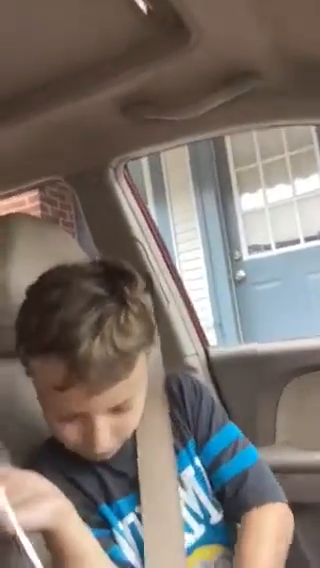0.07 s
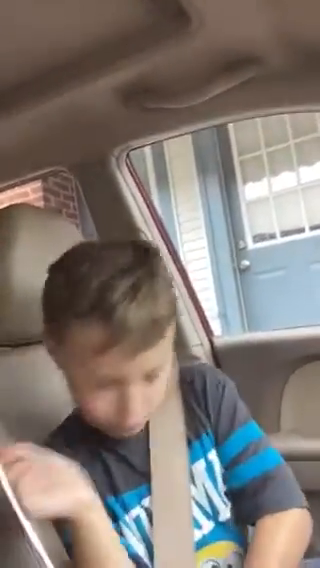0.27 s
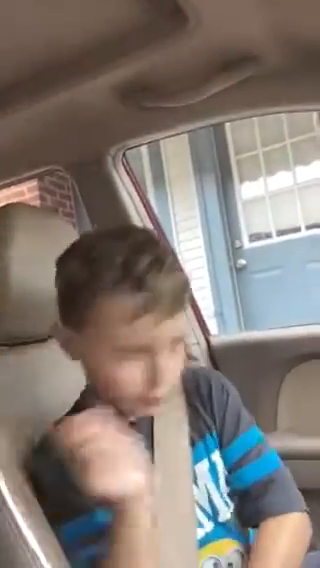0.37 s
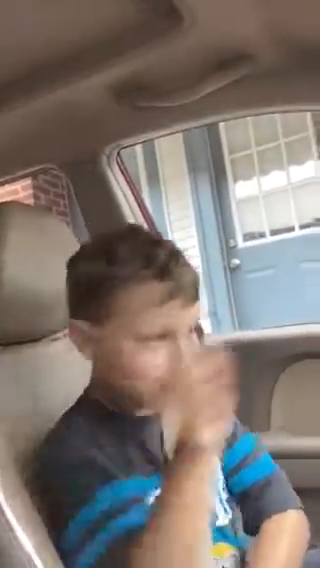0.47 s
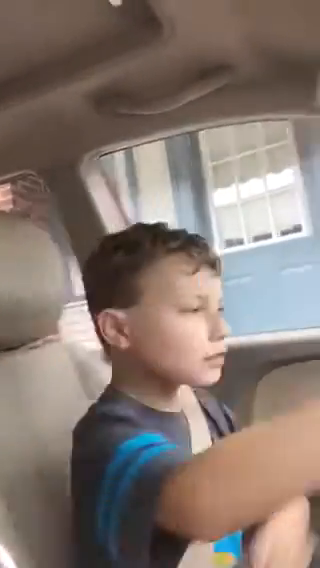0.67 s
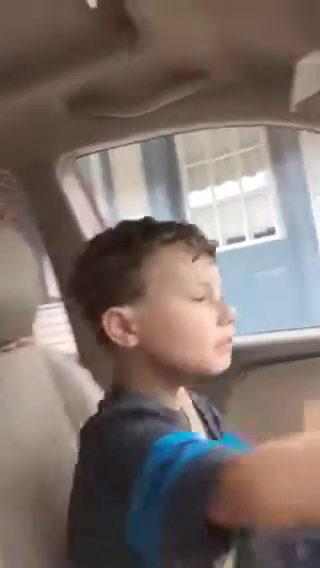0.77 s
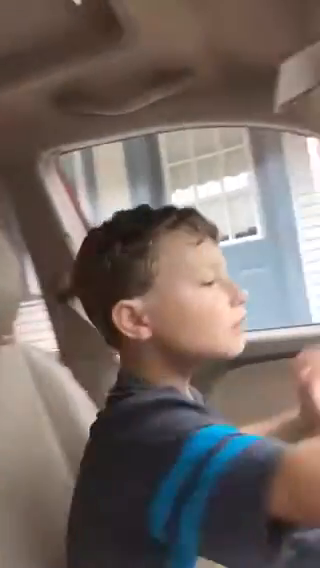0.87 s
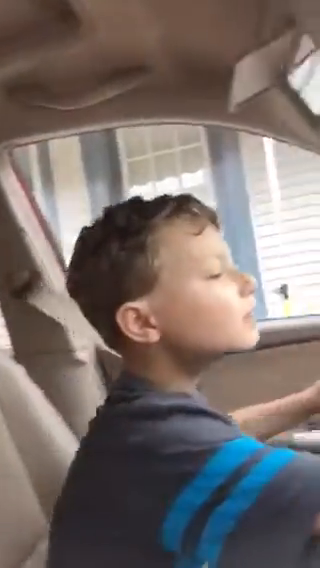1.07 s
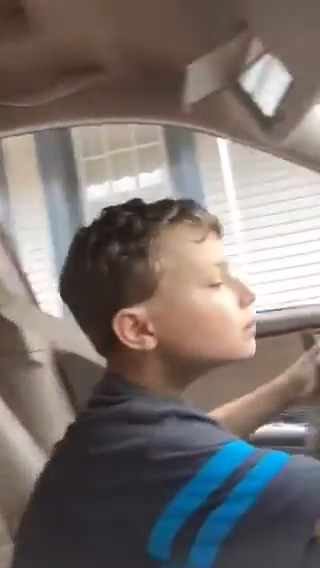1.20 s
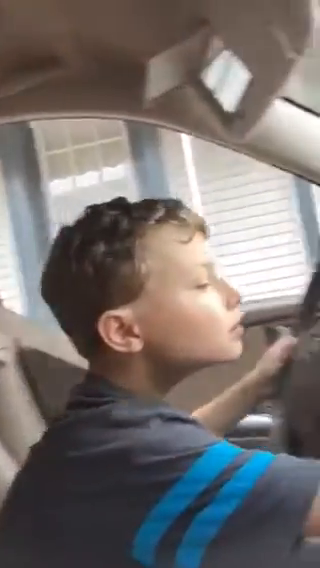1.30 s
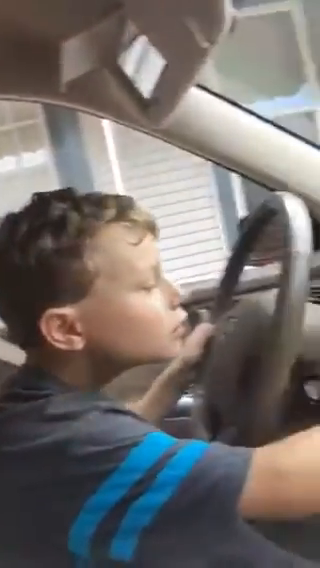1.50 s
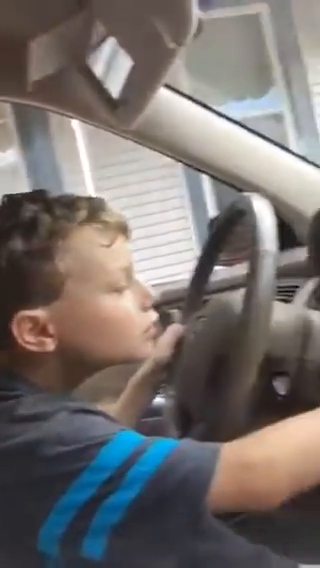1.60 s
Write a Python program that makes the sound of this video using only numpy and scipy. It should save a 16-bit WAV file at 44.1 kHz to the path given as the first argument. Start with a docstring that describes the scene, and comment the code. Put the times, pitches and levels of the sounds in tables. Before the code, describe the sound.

A seat belt is buckled inside a parked car. The metal tongue ticks lightly against the slot at about 0.1 seconds, then the latch snaps shut at 0.25 seconds with a sharp, dry metallic click. A smaller tick follows at 0.5 seconds. Faint cloth rustle, tiny ticks and soft padded bumps continue until about 1.6 seconds, over a faint low background noise.

```python
"""In a parked car, a seat belt is buckled: the tongue ticks against the slot, slides in, and the latch
snaps shut. The impact excites the damped modes of the steel, and absorption by the upholstery keeps
the reverberation short. Light ticks, cloth friction and padded bumps follow as someone shifts in
the seat, over a faint background noise."""
import sys
import numpy as np
from scipy import signal
from scipy.fft import rfft, irfft
from scipy.io import wavfile
from scipy.ndimage import uniform_filter1d

SR = 44100
rng = np.random.default_rng(int(sys.argv[2]) if len(sys.argv) > 2 else 0)


def unload_audio(sound):
    """Save the sound as a 16-bit wav file, at the path given as the first command line argument."""
    columns = np.transpose(np.atleast_2d(sound))
    # keep every value between -1 and 1, then stretch to whole-number steps
    steps = np.round(np.clip(columns, -1, 1) * 32767)
    wavfile.write(sys.argv[1], SR, steps.astype(np.int16))


N = 72765
T = np.arange(N) / SR

# contacts as the latch trips, snaps and rebounds: t/s, relative level/dB
LATCH_CONTACTS = [(0.2376, -8.5), (0.238, -3.5), (0.2403, 0), (0.2414, -0.5), (.2462, -8), (.2518, -17)]
# modes of the steel buckle: f/Hz, relative level/dB, T60/s
BUCKLE_MODES = [(590, -30, .03), (1060, -25, .05), (1427, -26, .07), (2070, -28.5, .06),
                (2890, -21.5, 0.038), (3020, -13.5, 0.041), (3240, -11, 0.011), (3470, -9.5, 0.037),
                (3870, -20, 0.043), (4075, -26.5, 0.038), (4575, -23, 0.038), (5100, -25, 0.04),
                (6880, -27, 0.032), (8160, -32.5, 0.043), (9700, -33, .042)]
# spectrum of the housing's crack: f/Hz, relative density/dB
CRACK_SPECTRUM = [(200, -26.5), (380, -29), (560, -1), (800, -15), (1100, -11), (1600, -5), (2400, 3),
                  (4200, 2), (6000, -5), (8000, -10.5), (12500, -13.5), (15500, -22)]
# spectrum of the cabin's diffuse field: f/Hz, relative density/dB
CABIN_SPECTRUM = [(300, -14.5), (800, -13), (1200, -3.5), (2000, -3.5), (3300, 5), (5000, -5), (10000, -9),
                  (15500, -20.5)]
# mode of the tongue, struck at the slot: t/s, f/Hz, level/dB, T60/s
TONGUE_MODE = (.103, 7330, -47, .062)
# light contacts of buckle, belt and trim:
# t/s, relative level/dB, peak f/Hz, fall below/(dB/octave), fall above/(dB/octave), T60/s
TICKS = [(0.0628, -42, 540, 8, 9, .06), (.0635, -50, 3000, 2, 20, 0.074),
         (0.092, -32.5, 3170, 2.5, 10, .05), (0.1023, -34.5, 3400, 1.5, 12, 0.059),
         (.118, -45, 3200, 4, 12, 0.074), (0.1344, -43, 4500, 4, 18, .045), (0.2225, -32, 2400, 8, 17, .06),
         (.229, -35, 2400, 8, 18, .022), (.2371, -17, 3500, 10, 8, .012),
         (0.4911, -26, 3600, 3.5, 11, .024), (0.503, -42, 1350, 14, 7, .07), (.559, -51, 2600, 6, 8, 0.11),
         (0.6017, -40.5, 2200, 9, 12, 0.082), (0.8891, -43, 1410, 14, 12, 0.038),
         (1.141, -52, 900, 4, 7, 0.033), (1.215, -45, 950, 2, 10, 0.054), (1.310, -55, 5200, 14, 16, 0.067),
         (1.333, -53, 1500, 4, 12, 0.053), (1.578, -43.5, 1266, 13, 9.5, 0.042),
         (1.615, -44.5, 2700, 0.2, 15, 0.047)]
# resonances of the trim: f/Hz, bandwidth/Hz, gain/dB
TRIM_RESONANCES = [(1220, 90, 4), (1400, 70, 3), (2650, 140, -1), (3380, 160, 0), (7200, 500, 1)]
# blows on seat and floor: t/s, relative level/dB
BUMPS = [(.111, -54), (.142, -48), (.254, -42), (.271, -49), (.546, -53), (1.072, -51), (1.089, -50),
         (1.322, -53), (1.339, -48), (1.452, -52)]
# modes of the seat: f/Hz, relative level/dB, T60/s
SEAT_MODES = [(55, -4.5, 0.24), (112, 1.5, 0.079), (155, -7, 0.042)]
# dull scuffs against the seat: t/s, level/dB, f/Hz, resonator bandwidth/Hz, T60/s
SCUFFS = [(.098, -53, 300, 110, .07), (.975, -61, 250, 35, .3), (1.037, -53, 350, 120, .06),
          (1.074, -53, 380, 160, .05), (1.228, -54, 170, 70, .11)]
# strength of the cloth's rubbing: t/s, relative level/dB
RUSTLE_ENVELOPE = [(0, -72.5), (.13, -61), (.21, -61.5), (.30, -60), (.39, -64.5), (.47, -61), (.55, -56.5),
                   (.65, -60.5), (.74, -59), (.85, -60.5), (.98, -66), (1.12, -65), (1.27, -63),
                   (1.40, -67.5), (1.52, -72), (1.65, -67)]
# spectrum of cloth friction: f/Hz, relative density/dB
CLOTH_SPECTRUM = [(150, 1), (300, -4), (600, 0), (1000, -6), (2000, -3.5), (4300, -10), (4900, -16),
                  (6300, -15.5), (8500, -25), (15500, -32)]
# resonances of the rubbed seat: f/Hz, bandwidth/Hz, gain/dB
UPHOLSTERY_RESONANCES = [(505, 60, -1), (880, 78, -2), (1250, 130, -4), (4100, 400, -8)]
# spectrum of the background: f/Hz, relative density/dB
BACKGROUND_SPECTRUM = [(25, -4), (55, 0), (120, -4), (220, -15), (600, -21), (1400, -24), (3500, -30),
                       (6000, -34), (9000, -41), (15500, -45)]

SNAP_S, STEEL_GAIN_DB = .2388, 2.2   # the catch lets go and the steel rings
CRACK_DB, CRACK_RISE_S, CRACK_T60_S = -15.5, .00051, .02
CABIN_DB, CABIN_RISE_S, CABIN_T60_S = -28.5, .002, .09
TICK_RISE_S, SCUFF_RISE_S = .0008, .003
CLOTH_GRAIN_DB, BACKGROUND_DB = 1.5, -62
PADDING_CUTOFF_HZ, CUTOFF_HZ = 220, 16000


def latch():
    """Impact excitation: the snap rings the steel; each contact cracks in the housing and reverberates."""
    def envelope(rise, t60):   # incoherent contacts add in power
        return np.sqrt(sum((from_db(db) * burst(start, rise, t60)) ** 2 for start, db in LATCH_CONTACTS))
    crack = from_db(CRACK_DB) * noise(CRACK_SPECTRUM) * envelope(CRACK_RISE_S, CRACK_T60_S)
    cabin = from_db(CABIN_DB) * noise(CABIN_SPECTRUM) * envelope(CABIN_RISE_S, CABIN_T60_S)
    steel = sum((-1) ** k * ring(SNAP_S, *mode) for k, mode in enumerate(BUCKLE_MODES))
    return from_db(STEEL_GAIN_DB) * steel + crack + cabin


def tongue():
    """Free vibration: the steel tongue pings in one mode as it meets the slot."""
    return ring(*TONGUE_MODE)


def ticks():
    """Brief contacts radiate broadband transients, which resonance in the trim colours."""
    contacts = 0
    hz = np.geomspace(250, 16000, 25)
    for start, db, peak_hz, fall_below, fall_above, t60 in TICKS:
        octaves = np.log2(hz / peak_hz)
        spectrum = np.c_[hz, np.minimum(fall_below * octaves, -fall_above * octaves)]
        contacts += from_db(db) * noise(spectrum) * burst(start, TICK_RISE_S, t60)
    return .5 * coloured(contacts, TRIM_RESONANCES)


def bumps():
    """Modal superposition: each blow rings every seat mode, and the padding acts as a low-pass filter."""
    seat = 0
    for start, blow_db in BUMPS:
        for hz, mode_db, t60 in SEAT_MODES:
            scatter_db = 1.5 * rng.standard_normal()
            seat += ring(start, hz, blow_db + mode_db + scatter_db, t60)
    padding = signal.butter(2, PADDING_CUTOFF_HZ, fs=SR, output="sos")
    return signal.sosfilt(padding, seat)


def scuffs():
    """Forced vibration: the friction noise of each brief rub drives one low resonance."""
    rubs = 0
    for start, db, hz, width, t60 in SCUFFS:
        friction = rng.standard_normal(N)
        rub = resonance(resonance(friction, hz, width), hz, width)
        rubs += from_db(db) * rub / rub.std() * burst(start, SCUFF_RISE_S, t60)
    return rubs


def rustle():
    """Sliding friction: cloth drags over the seat in fine, uneven catches that modulate its noise."""
    grain = uniform_filter1d(rng.standard_normal(N), size=150)
    rubbing_db = np.interp(T, *np.transpose(RUSTLE_ENVELOPE))
    friction = coloured(noise(CLOTH_SPECTRUM), UPHOLSTERY_RESONANCES)
    return friction * from_db(rubbing_db + CLOTH_GRAIN_DB * grain / grain.std())


def background():
    """Stationary noise, faint and strongest in the bass."""
    return from_db(BACKGROUND_DB) * noise(BACKGROUND_SPECTRUM)


def from_db(db):
    """Amplitude ratio of a level in decibels."""
    return 10 ** (np.asarray(db) / 20)


def noise(spectrum):
    """Spectral shaping of white noise by (f/Hz, level/dB) points, scaled to unit rms."""
    hz, db = np.transpose(spectrum)
    f = np.maximum(np.fft.rfftfreq(N, 1 / SR), 1)
    gain = from_db(np.interp(np.log(f), np.log(hz), db))
    bass_rolloff = np.minimum(f / hz[0], 1) ** 2
    shaped = irfft(rfft(rng.standard_normal(N)) * gain * bass_rolloff, N)
    return shaped / shaped.std()


def burst(start, rise, t60):
    """Transient envelope: a quick rise and an exponential decay."""
    age = np.maximum(T - start, 0)
    return (1 - np.exp(-age / rise)) * from_db(-60 * age / t60)


def ring(start, hz, db, t60):
    """Damped harmonic oscillation of one mode."""
    age = np.maximum(T - start, 0)
    return from_db(db - 60 * age / t60) * np.sin(2 * np.pi * hz * age)


def resonance(x, hz, width):
    """Two-pole resonator with unit gain at its peak."""
    radius = np.exp(-np.pi * width / SR)
    numerator = np.array([1, 0, -1]) * (1 - radius ** 2) / 2
    denominator = [1, -2 * radius * np.cos(2 * np.pi * hz / SR), radius ** 2]
    return signal.lfilter(numerator, denominator, x)


def coloured(x, resonances):
    """Parallel resonators add their responses to the direct sound."""
    return x + sum(from_db(db) * resonance(x, hz, width) for hz, width, db in resonances)


def scene():
    """Superposition of buckle, movement and background at one point."""
    movement = ticks() + rustle() + scuffs() + bumps()
    return (latch() + tongue() + movement + background())[None]


def record(dry):
    """Band limiting: an elliptic low-pass filter cuts the top steeply."""
    return signal.sosfilt(signal.ellip(12, .1, 85, CUTOFF_HZ, fs=SR, output="sos"), dry)


dry = scene()
out = record(dry)
unload_audio(out)
```